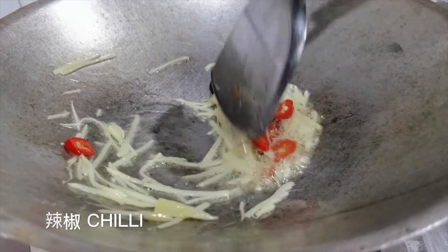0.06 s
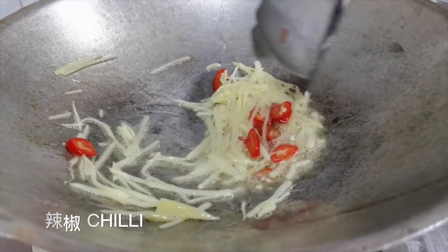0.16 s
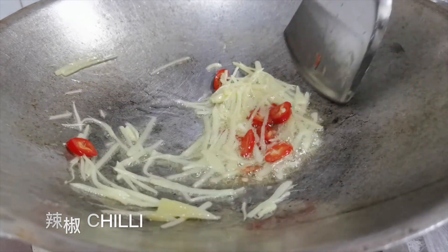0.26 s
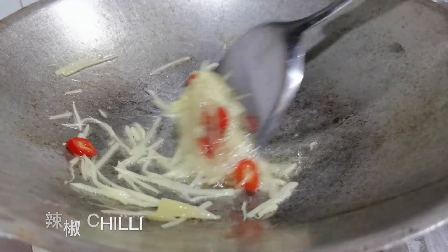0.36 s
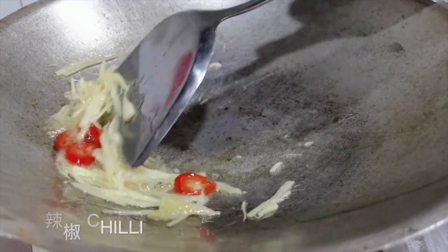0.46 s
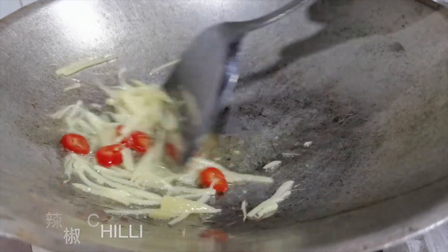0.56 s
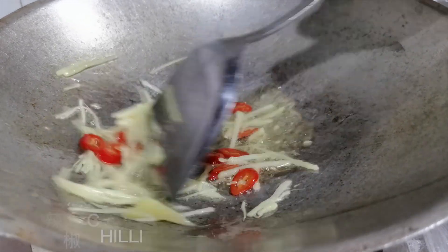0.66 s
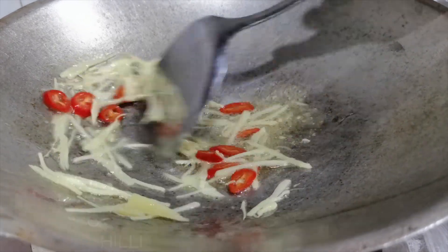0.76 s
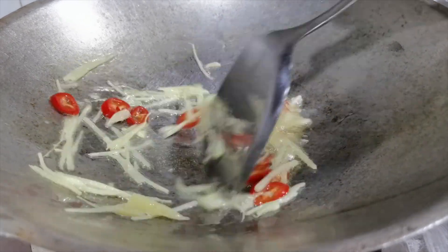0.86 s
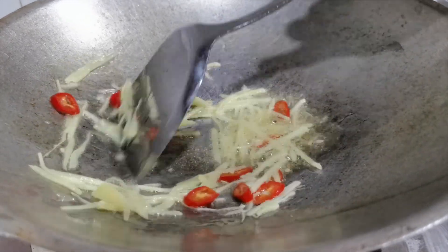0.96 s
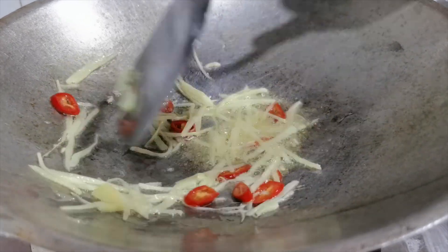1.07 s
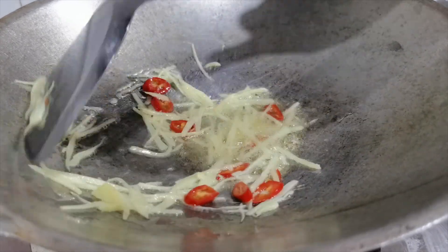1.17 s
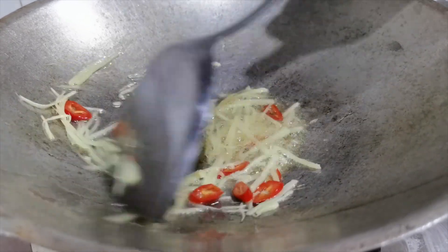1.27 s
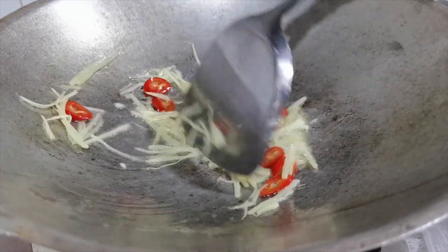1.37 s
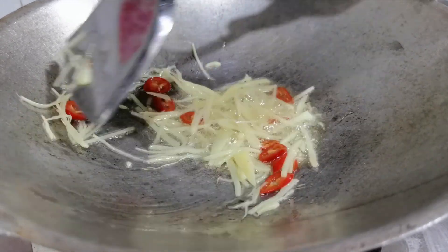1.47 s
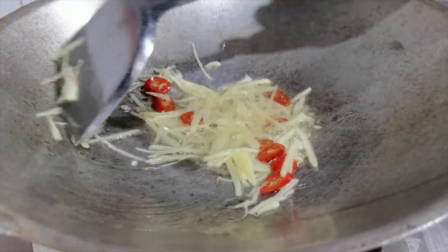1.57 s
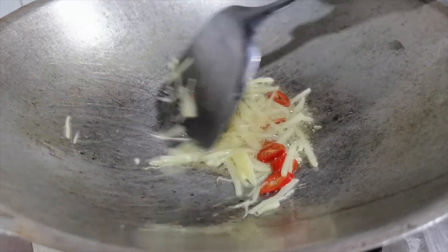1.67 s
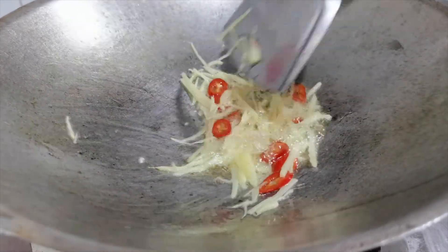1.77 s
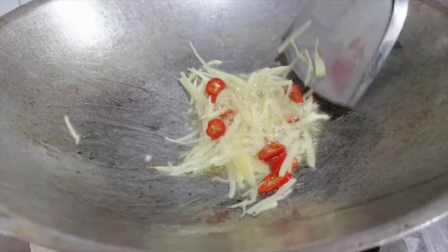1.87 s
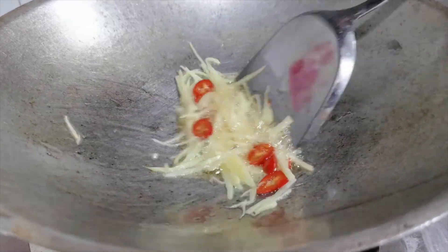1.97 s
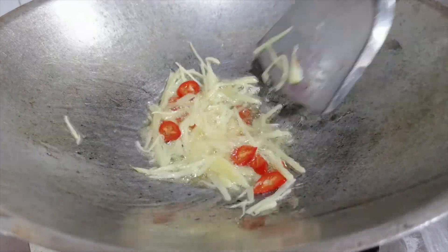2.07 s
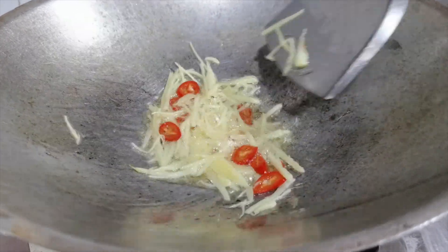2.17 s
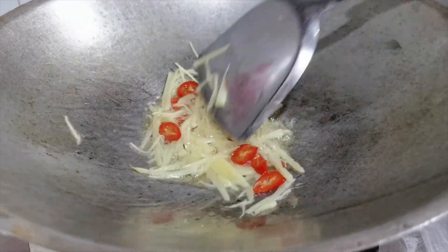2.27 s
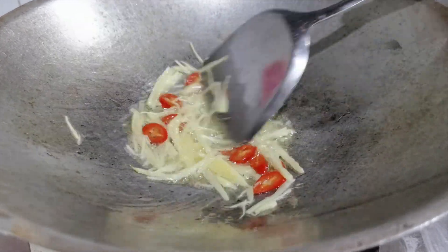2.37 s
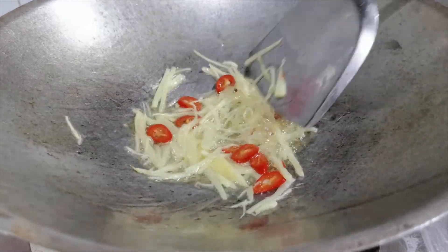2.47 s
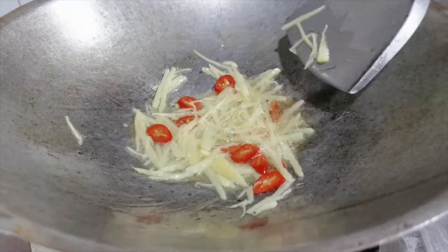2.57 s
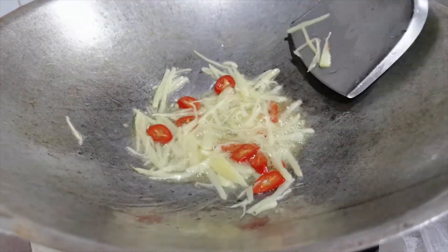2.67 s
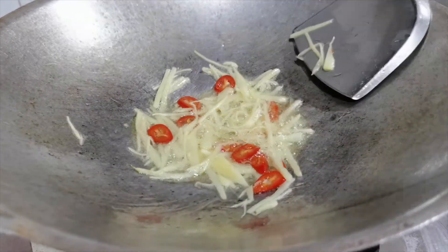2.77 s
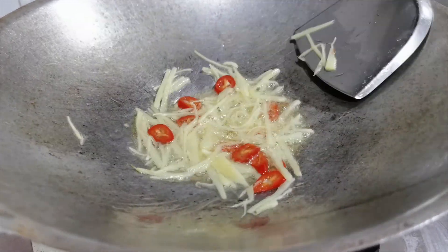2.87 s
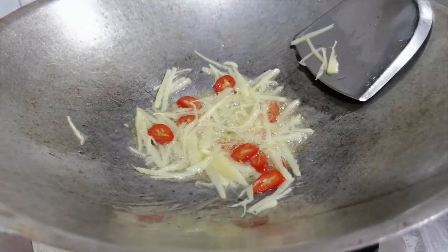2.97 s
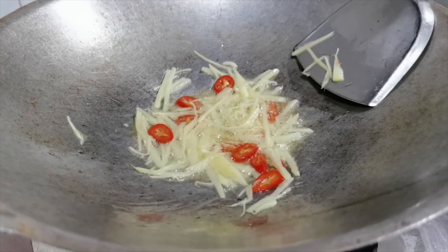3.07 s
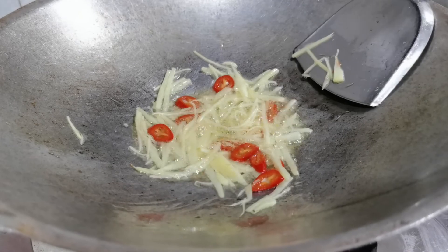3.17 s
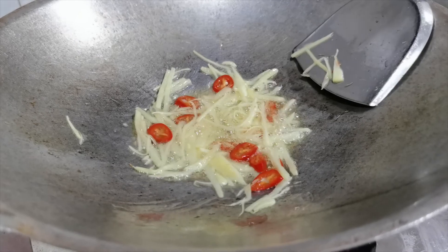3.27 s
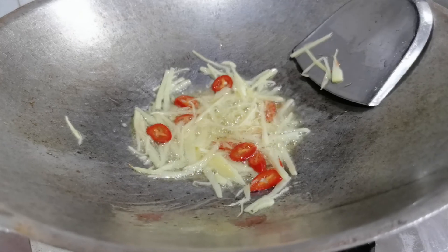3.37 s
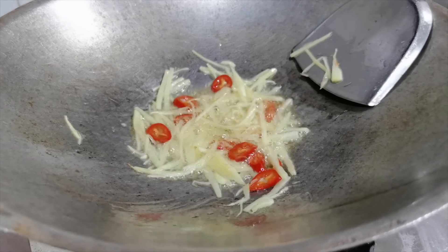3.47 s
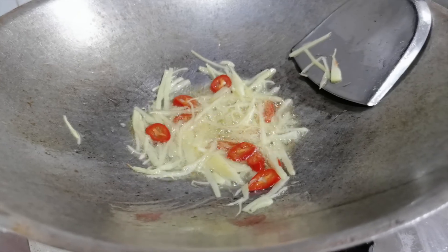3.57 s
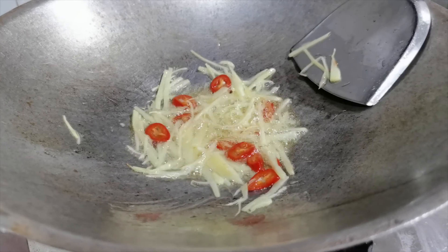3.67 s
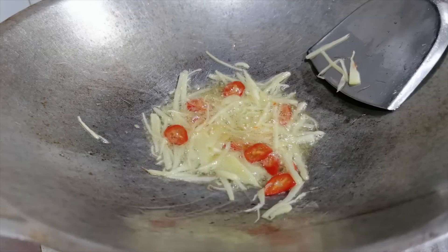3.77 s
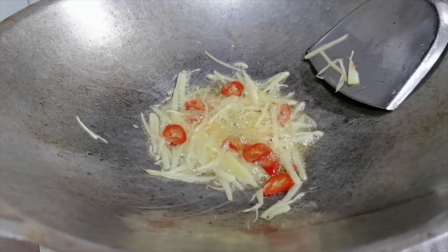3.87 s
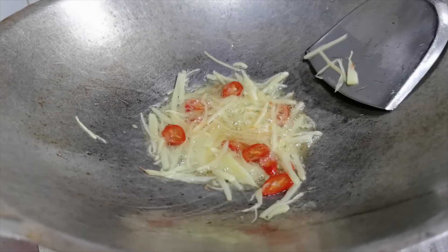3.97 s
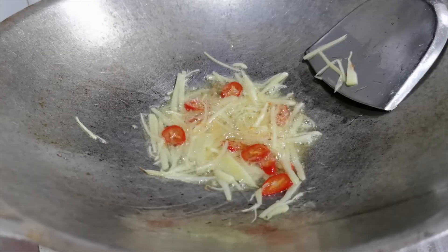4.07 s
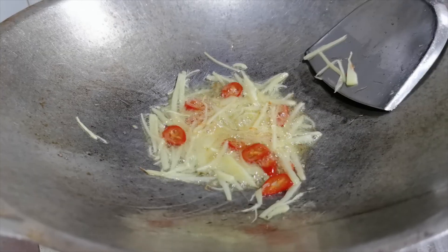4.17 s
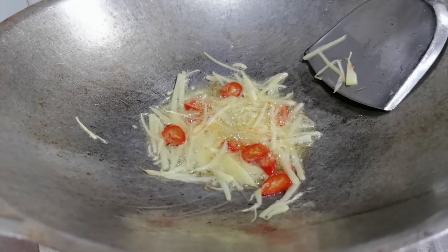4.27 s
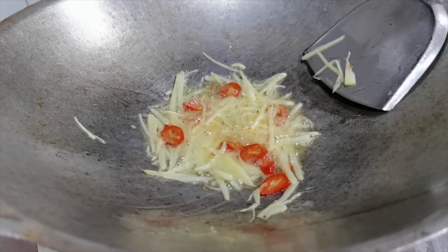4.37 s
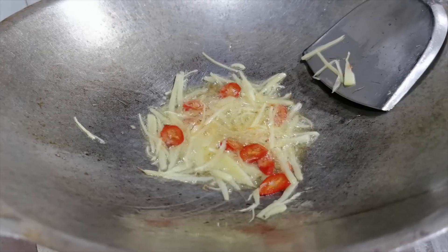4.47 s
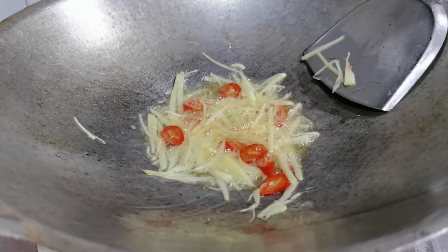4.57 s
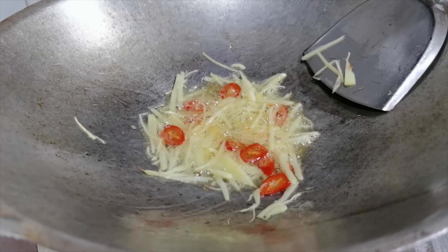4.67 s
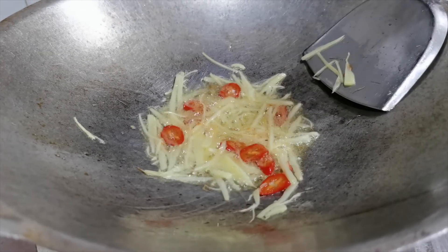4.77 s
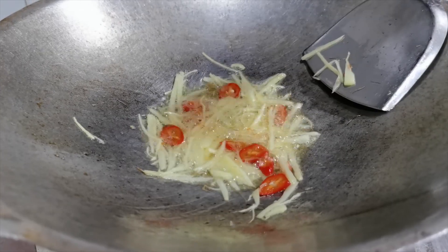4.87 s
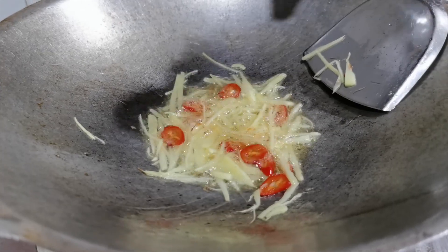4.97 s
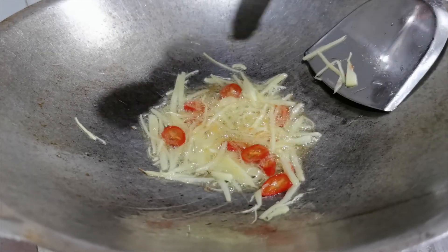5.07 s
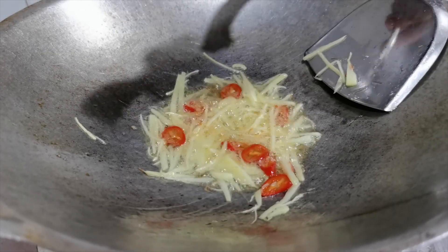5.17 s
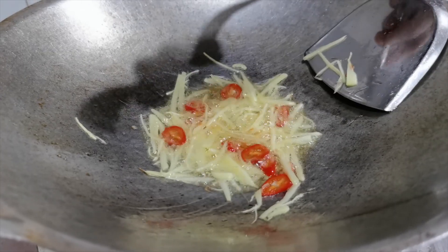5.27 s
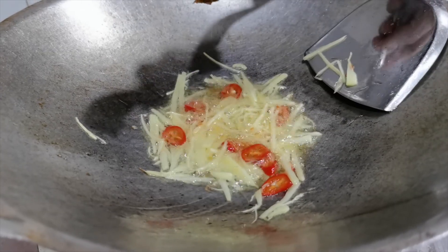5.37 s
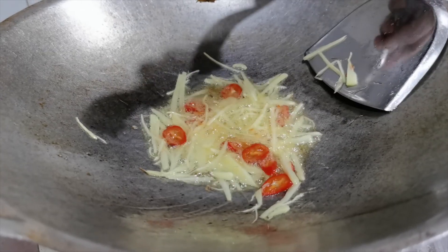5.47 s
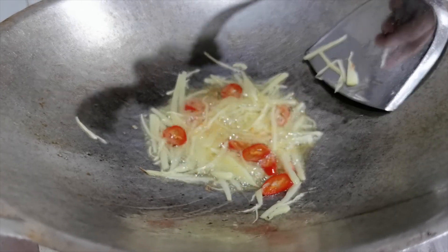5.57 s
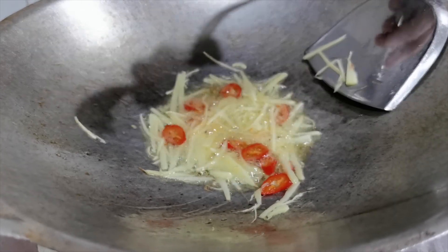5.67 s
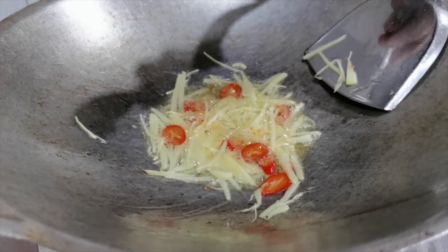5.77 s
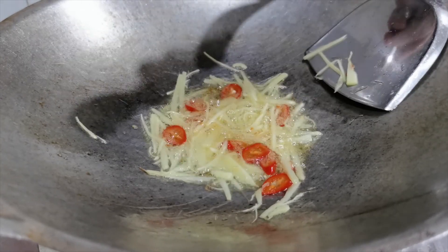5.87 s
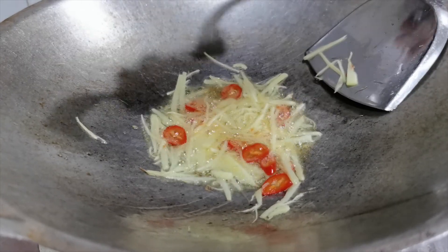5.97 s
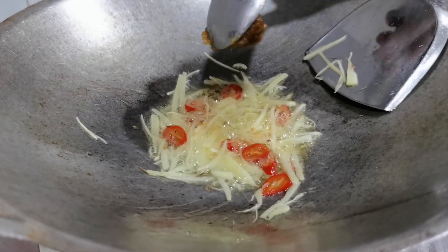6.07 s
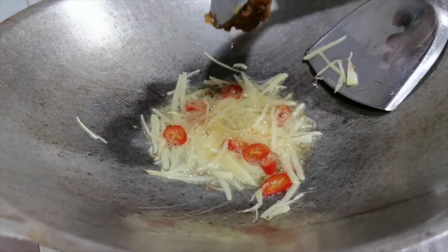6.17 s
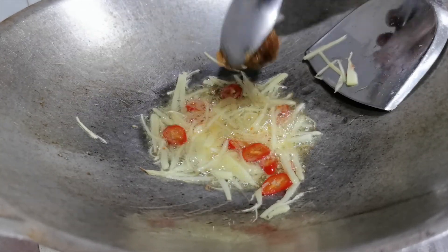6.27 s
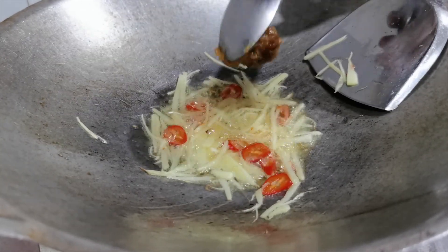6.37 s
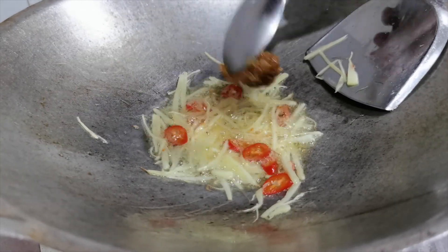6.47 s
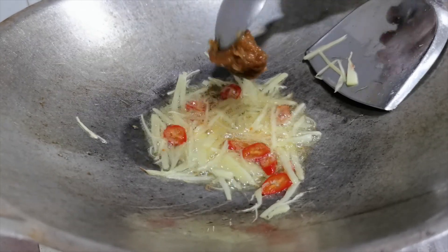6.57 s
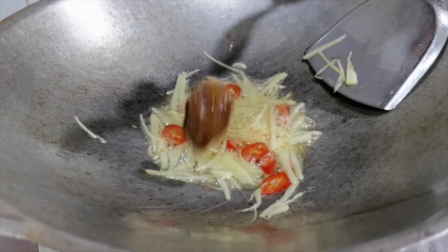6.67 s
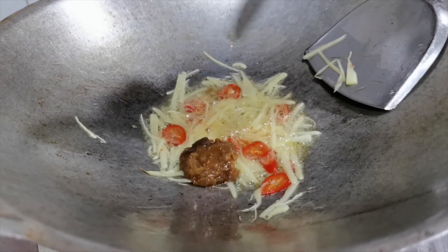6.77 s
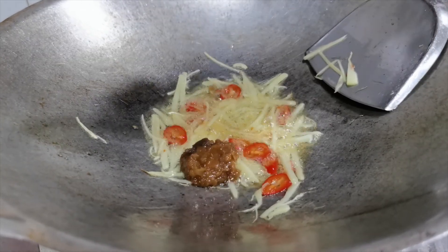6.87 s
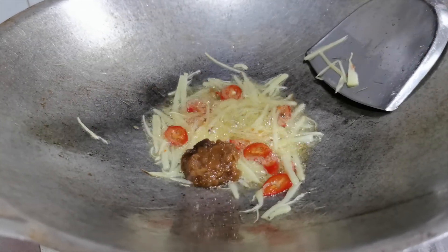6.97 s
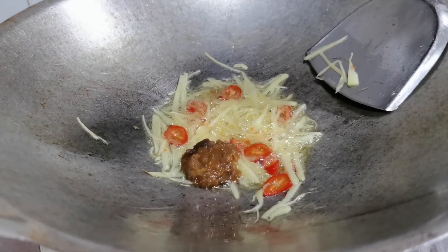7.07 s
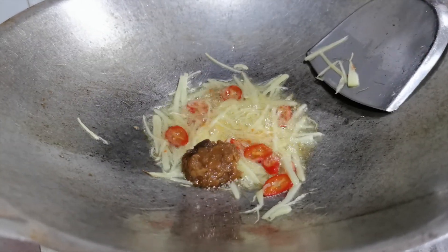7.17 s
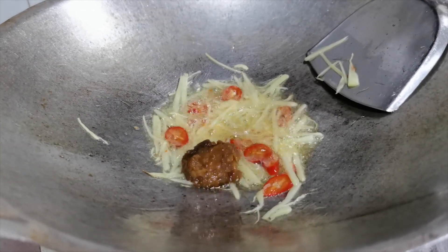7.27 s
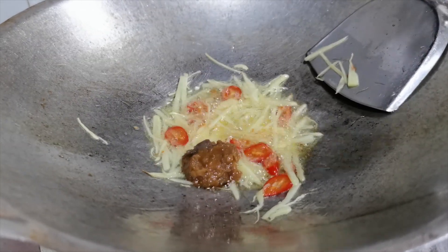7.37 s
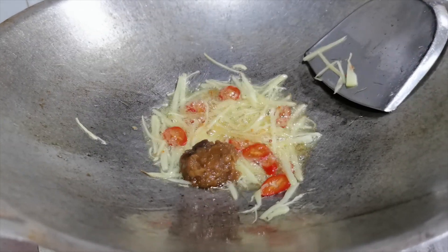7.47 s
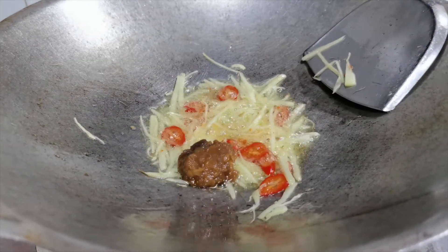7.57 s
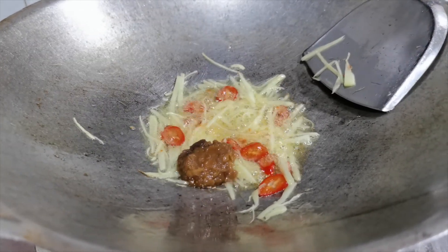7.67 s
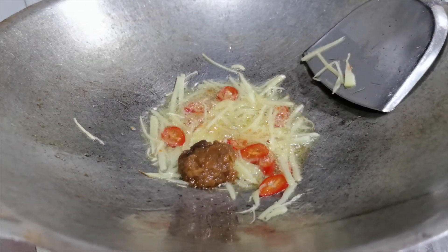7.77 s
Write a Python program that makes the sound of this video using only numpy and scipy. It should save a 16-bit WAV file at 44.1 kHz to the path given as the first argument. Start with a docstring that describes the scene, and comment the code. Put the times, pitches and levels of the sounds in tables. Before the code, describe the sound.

Vegetables sizzle in hot oil in a steel wok, heard up close in a small kitchen. A metal spatula strikes and scrapes the pan several times, leaving it ringing, then is set down with a clink and a brief chatter. The frying carries on with sharp little spits. Near the end, wet paste lands in the oil with a sudden loud hiss that eases off. A gas flame and fan hum faintly underneath.

```python
"""Stir-frying in a wok

Ginger and chilli sizzle in a steel wok over a gas flame, under a small kitchen's extractor fan.
Water bursts in the hot oil as fizz and single spits; late on, a spoonful of wet paste flares up.
A steel spatula strikes and scrapes the wok, rings as it lifts off, and is laid against the side."""
import sys
import numpy as np
from scipy import signal
from scipy.fft import rfft, irfft, next_fast_len
from scipy.io import wavfile

SR = 44100
rng = np.random.default_rng(int(sys.argv[2]) if len(sys.argv) > 2 else 0)


def waveform_to_disk(signal):
    """Save audio, clipped to [-1, 1], as 16-bit WAV at the path in sys.argv[1]."""
    frames = np.transpose(np.atleast_2d(signal))
    scaled = np.clip(frames, -1, 1) * 32767
    samples = np.round(scaled).astype(np.int16)
    wavfile.write(sys.argv[1], SR, samples)


N = 345303
T = np.arange(N) / SR
FFT_SIZE = next_fast_len(N + SR)
HZ = np.maximum(np.arange(FFT_SIZE // 2 + 1) * SR / FFT_SIZE, 1)

# A soft mid-range rush comes up. Each row: time in seconds, level in dB.
RUSH_LEVELS = [(0, -56), (3.7, -46), (3.95, -46), (7.83, -40.5)]
# The hum of the fan's motor. Each row: pitch in Hz, relative level in dB.
MOTOR_TONES = [(118.4, -50.5), (296.1, -60.5), (382.2, -62.5)]
# Swells in the flame's sound. Each row: middle in seconds, half-length in seconds, level in dB.
FLAME_PUFFS = [(1.35, 0.21, -56), (2.51, 0.039, -43), (4.0, 0.74, -57), (6.06, 0.21, -52)]
HOLLOW_SWELLS = [(3.35, 0.44, -44.5)]  # the roar turns hollow for a moment
LOW_BOOM_SWELLS = [(4.0, 0.7, -60), (6.5, 0.76, -51)]
# How hard the vegetables fry. Each row: time in seconds, relative level in dB.
FRYING_LEVELS = [(0.0, -39), (1.93, -41.5), (2.94, -40.5), (3.46, -43), (4.5, -39.5), (5.98, -42),
                 (6.65, -42)]
# The biggest water drops spit. Each row: time in seconds, relative level in dB, pitch in Hz.
BIG_DROPS = [(0.0697, -24.5, 10400), (0.4454, -18.5, 9180), (0.4868, -23.5, 9870), (1.052, -25, 7800),
             (2.5411, -26.5, 5700), (2.6344, -23, 11800), (3.091, -19, 6700), (3.2276, -22.5, 5620),
             (3.6726, -16, 12700), (4.6932, -18.5, 10200), (4.927, -22.5, 5950), (5.3268, -11.5, 6820),
             (5.5376, -15, 5170), (5.8912, -18, 7900), (5.9708, -20, 8000), (7.337, -16, 9800)]

# The spatula hits the wok; a loosely held blade clinks most. Each row: time in seconds, relative
# thud and clash levels in dB, clink compared with clash in dB, left minus right in dB,
# wait until the bounce in seconds, bounce compared with the hit in dB.
SPATULA_HITS = [(0.238, -38.5, -16.5, -1, 1, .013, 1.5), (0.739, -26, -29.5, -8, 1, 0.018, -18),
                (1.205, -18, -20, -6, -1, .007, -13), (1.534, -21.5, -20.5, -7, 1, .01, -15),
                (1.917, -35, -16, -7, 1.5, 0.039, -10), (2.703, -36, -15.5, 2, -1.5, 0.021, -2.5)]
# The blade is pushed along the steel. Each row: start and length in seconds, then the starting
# levels of groan, squeal and rasp in dB.
SCRAPE_STROKES = [(0.288, 0.083, -34, -42, -22.5), (0.527, 0.036, -42.5, -68, -41),
                  (0.756, 0.12, -37.5, -38.5, -28), (1.541, 0.064, -29, -33, -50),
                  (1.582, 0.085, -38.5, -27.5, -24.5), (1.933, 0.07, -34.5, -60, -28.5),
                  (2.301, 0.11, -44.5, -61, -34), (2.72, 0.048, -40, -44, -35)]
# The sliding edge catches. Each row: time in seconds, relative chatter and clash levels in dB.
EDGE_CATCHES = [(2.703, -25, -35), (2.769, -32, -29), (2.807, -29, -34), (2.875, -40, -34),
                (2.967, -34.5, -37), (3.02, -33.5, -32.5), (3.044, -38, -45), (3.163, -32, -39)]
# The steel is left to ring. Each row: start in seconds, relative level in dB, place struck
# (0 far wall, 1 near floor, 2 left side), build-up time in seconds.
RING_EVENTS = [(.241, -23.5, 0, 0.11), (1.207, -23.5, 1, 0.0044), (1.536, -21.5, 2, 0.02)]
# The tones of the freely ringing spatula and wok. Each row: pitch in Hz, seconds to fade by 60 dB,
# then relative levels in dB when struck at the far wall, the near floor and the left side.
STEEL_TONES = [(948, 1.85, -25.5, -8, -35), (1300, 0.93, -10.5, -1, -8.5), (1441, 2, -19, -14, -10),
               (1566, 0.56, 2.5, 2, 2), (1797, 1.01, -13, -4, -20), (1930, 1.9, -43, -15.5, -24),
               (2205, 0.86, -18, -9, -16), (2444, 1.4, -46, -13, -17), (2764, 0.97, -25, -11, -18),
               (2932, 0.77, -5.5, -6, -24), (3300, 0.66, -1, -5.5, -13), (3450, 1.4, -18, -17, -16),
               (3720, 0.74, -2.5, -11.5, -2.5), (4334, 0.78, -20, -14, -34)]

# Modes are the pitches that steel likes to shake at; pressing on it makes them broad and short.
# Each row: pitch in Hz, width in Hz, relative level in dB.
CLANG_MODES = [(616, 54, -5), (752, 53, -4), (1042, 47, 0), (1194, 52, -1), (3280, 39, -11), (4000, 45, -5),
               (5000, 55, -16), (5750, 120, -1)]  # the pressed wok
CLINK_MODES = [(440, 91, -1.5), (1548, 174, -3), (2853, 110, -2.5), (4800, 114, 8), (5400, 180, -6),
               (6100, 140, 3), (6600, 300, -11), (10270, 470, -2), (12200, 280, -3)]  # the blade pressing on it
GROAN_MODES = [(369, 59, -5), (476, 27, 3), (570, 40, 1.5), (702, 63, -3), (1040, 1000, -12.5),
               (1710, 300, -11), (2920, 470, -54)]
SQUEAL_MODES = [(1115, 180, 5.5), (1220, 110, 10.5), (1580, 110, 0), (1790, 110, -8)]
CHATTER_MODES = [(497, 190, -8), (860, 240, -12), (1120, 280, -9), (1376, 97, 2), (1570, 125, -0.5),
                 (2000, 350, -14), (2320, 240, -8), (2550, 140, -5.5), (2940, 140, -11), (3770, 730, -11.5),
                 (4690, 110, -3.5), (5800, 1500, -7.5)]

# The tone colour of each noise, from bass to treble. Each row: frequency in Hz, relative level in dB.
RUSH_COLOUR = [(150, -7), (400, -6.5), (750, -9), (1000, -4), (2000, -11.5), (5000, -8)]
FLAME_COLOUR = [(20, -28), (35, -13), (95, -15), (120, 3.5), (150, -1), (200, -4), (260, -9), (310, -19),
                (420, -16), (520, -23.5), (800, -32.5), (2000, -41)]
FIZZ_COLOUR = [(500, -24.5), (1000, -12), (2000, -9.5), (2600, -10.5), (3200, 1.5), (4300, -4), (5400, 0.5),
               (6800, -2.5), (8500, -2.5), (10400, 0.5), (12000, -4.5), (13500, -6), (16000, -1.5)]
PASTE_COLOUR = [(600, -27), (1200, -23), (2000, -8.5), (2700, -7), (3600, 2.5), (4350, -12), (5000, 1.5),
                (5700, 4), (6200, 3), (8200, -3), (10300, 1), (12000, -5.5), (14000, -8), (16000, -1)]
SPIT_COLOUR = [(1500, -23), (4000, -5), (16000, 2.5)]
RASP_COLOUR = [(1500, -15.5), (3400, -8.5), (4300, -8), (5400, 2.5), (7000, -2), (8600, -2.5), (10500, -2),
               (16000, -10.5)]
THUD_COLOUR = [(200, -39), (350, -1.5), (550, 7), (900, -0.5), (1200, 3), (1650, -1), (2200, -15.5),
               (3300, -13.5), (4500, -18)]
CLASH_COLOUR = [(1000, -36), (1550, -8), (2050, -11), (2850, -7.5), (4300, -12), (4820, -3), (5400, 0),
                (6800, 0.5), (8600, -7.5), (10200, 0.5), (11500, -3), (12100, -14), (12900, -4),
                (16000, -8.5)]

# How the two microphone openings differ. Each row: frequency in Hz, left minus right in dB.
MIC_BALANCE = [(60, 1.2), (200, 3.5), (700, 0.5), (1300, 1), (2400, 2.5), (3700, -3.5), (5500, 1.5),
               (7000, -4), (8300, 4.5), (9800, -0.5), (11000, 9.5), (12300, -15), (14000, -0.5),
               (16000, -2)]


def gain(db):
    """Turn decibels into a number to multiply by."""
    return 10 ** (np.asarray(db) / 20)


def unit(x):
    """Scale x to an average power of 1."""
    return x / np.sqrt(np.mean(abs(x) ** 2))


def pan(left_minus_right_db):
    """Gains for the left and right channels."""
    return gain(np.array([[1], [-1]]) * left_minus_right_db / 2)


def add(out, start_s, x):
    """Mix x into out at the given time."""
    i = int(start_s * SR)
    out[:, i:i + x.shape[1]] += x[:, :N - i]


def curve(rows):
    """Join (time, value) rows with straight lines."""
    return np.interp(T, *np.transpose(rows))


def swells(rows):
    """A gain that rises and falls smoothly once for each row."""
    return sum(gain(db) * np.exp(-((T - middle_s) / half_s) ** 2) for middle_s, half_s, db in rows)


def wander(turns_per_s):
    """A random drift around zero, usually by about 1."""
    points = rng.standard_normal(1024)
    return 1.6 * np.interp(T * turns_per_s, np.arange(len(points)), points)


def causal(gains):
    """Build a filter with these gains that rings only after it is struck, never before."""
    cepstrum = irfft(np.log(gains + 1e-4), FFT_SIZE)
    cepstrum[1:FFT_SIZE // 2] *= 2
    cepstrum[FFT_SIZE // 2 + 1:] = 0
    return np.exp(rfft(cepstrum))


def colour(rows):
    """A filter that follows a tone colour table."""
    hz, db = np.transpose(rows)
    return causal(gain(np.interp(np.log(HZ), np.log(hz), db)))


def resonances(modes):
    """A filter with one steep peak for each mode."""
    peaks = (gain(db) / (1 + ((HZ - hz * hz / HZ) / width) ** 2) for hz, width, db in modes)
    return causal(np.sqrt(sum(peak ** 2 for peak in peaks)))


def through(x, response):
    """Pass x through a filter, scaled so that white noise keeps its level."""
    return irfft(rfft(x, FFT_SIZE) * unit(response), FFT_SIZE)[..., :N]


def burst(fade_s):
    """Crowded echoes: stereo noise that dies away by 60 dB in fade_s."""
    t = T[:SR // 2]
    return rng.standard_normal((2, len(t))) * np.exp(-np.log(1000) * t / fade_s)


def rattle(per_s, scatter_db, fade_s, force=1):
    """Random clicks of unequal size, each with its own tail of echoes off the bowl."""
    sizes = gain(scatter_db * np.minimum(rng.standard_normal(N), 2.6))
    clicks = unit((rng.random(N) < per_s / SR) * sizes) * force
    decay = np.exp(-2 * np.log(1000) / (fade_s * SR))
    power = signal.lfilter([1 - decay], [1, -decay], clicks ** 2 + 1e-18)
    return np.sqrt(power) * rng.standard_normal((2, N))


def push(start_s, length_s, rise_s=0.0018):
    """The pressure of one stroke: on quickly, off a little more slowly."""
    press = np.clip((T - start_s) / rise_s, 0, 1)
    release = np.clip((start_s + length_s - T) / (2 * rise_s) + .5, 0, 1)
    return press * release


def kitchen_echo(x, fade_s=.25):
    """The tiled walls send back a short echo, with left and right swapped."""
    tail = burst(fade_s)
    tail /= np.sqrt(np.sum(tail ** 2) / 2)
    return signal.fftconvolve(x[::-1], tail, axes=1)[:, :N]


def soft_rush():
    """A soft mid-range rush comes up in the background."""
    return through(rng.standard_normal((2, N)), colour(RUSH_COLOUR)) * gain(curve(RUSH_LEVELS))


def extractor_fan():
    """The motor hums with a slight waver."""
    hum = np.zeros(N)
    for hz, db in MOTOR_TONES:
        tone = unit(np.sin(2 * np.pi * hz * T + 0.15 * wander(2.7)))
        hum += tone * gain(db - 2.5 + 2 * wander(2.09))
    return hum


def gas_burner(roar_db=-44, boom_db=-62, boom_hz=65.5):
    """The flame roars, flutters and puffs, with a low boom swelling under it."""
    flutter = gain(1.55 * wander(7.7))
    roar = through(rng.standard_normal((2, N)), colour(FLAME_COLOUR))
    roar *= (gain(roar_db) + swells(FLAME_PUFFS)) * flutter
    hollow = through(rng.standard_normal(N), resonances([(146.5, 30, 0)])) * swells(HOLLOW_SWELLS)
    boom = unit(np.sin(2 * np.pi * boom_hz * T + .5 * wander(7.2)))
    boom *= (gain(boom_db) + swells(LOW_BOOM_SWELLS)) * gain(2 * wander(8))
    return roar + hollow + boom


def steam_bubbles(per_s_at_8khz, scatter_db):
    """Tiny bubbles burst, each size at its own pitch; small, high ones are the most common."""
    out = 0
    for hz in np.geomspace(3500, 14000, num=11):
        band = signal.butter(2, [hz * .91, hz * 1.09], "band", fs=SR, output="sos")
        pops = rattle(per_s_at_8khz * hz / 8000, scatter_db, fade_s=0.084)
        out = out + signal.sosfilt(band, pops) * (hz / 8000) ** .5
    return unit(out)


def oil_resonance():
    """A filter for the two high pitches at which the pool of frying oil resonates."""
    return 1 + resonances([(5644, 330, -1.5), (10550, 250, -12)])


def frying_vegetables():
    """Water bursts in the oil as a fine fizz with a coarser crackle on top."""
    fizz = rattle(per_s=6000, scatter_db=7.6, fade_s=0.013) * gain(1.3 * wander(18))
    crackle = steam_bubbles(130, scatter_db=6.5) * gain(wander(5) - 1.5)
    sizzle = (fizz + crackle) * gain(curve(FRYING_LEVELS) + 0.5)
    return through(sizzle, colour(FIZZ_COLOUR) * oil_resonance())


def wet_paste(start_s=6.697, rise_s=.028, boil_s=0.061):
    """Wet paste lands in the oil, hisses up quickly and calms as its water boils off."""
    age = np.maximum(T - start_s, 0)
    level_db = -25.5 - 7 * np.log10(1 + age / boil_s)
    strength = np.minimum(age / rise_s, 1) * gain(level_db + 0.58 * wander(25))
    hiss = rattle(per_s=8600, scatter_db=3, fade_s=0.038)
    crackle = gain(-4.5) * steam_bubbles(300, scatter_db=7.1)
    return through((hiss + crackle) * strength, colour(PASTE_COLOUR) * oil_resonance())


def spitting_drops(small_per_s=3.5, low_hz=6500, high_hz=12000):
    """Big drops and random small ones each burst with a crack that rattles about the bowl."""
    chances = rng.random((int(small_per_s * N / SR), 3))
    small_drops = [(when * T[-1], -29.5 + 5 * size, low_hz * (high_hz / low_hz) ** pitch)
                   for when, size, pitch in chances]
    out = np.zeros((2, N))
    for start_s, db, hz in list(BIG_DROPS) + small_drops:
        band = signal.butter(1, [hz * .88, hz * 1.11], "band", fs=SR, output="sos")
        crack = signal.sosfilt(band, burst(.022) + gain(-14) * burst(.11))
        crack /= np.sqrt(np.mean(crack[:, :SR // 250] ** 2))  # the first 4 ms set the level
        level_db = db - 5 - np.log2(hz / 8000)  # higher-pitched cracks are played a little quieter
        add(out, start_s + .0008, crack * gain(level_db))
    return through(out, colour(SPIT_COLOUR)) * pan(2.1)


def spatula_settling(start_s=2.703, length_s=.53, catch_decay_s=0.02):
    """The spatula chatters as it slides to rest, louder each time its edge catches."""
    age = np.clip(T - start_s, 0, length_s)
    slide = gain(-45 + age) * push(start_s, length_s)  # nearly even: up 1 dB a second
    catches = sum(gain(db) * (T > catch_s) * np.exp(-abs(T - catch_s) / catch_decay_s)
                  for catch_s, db, _ in EDGE_CATCHES)
    chatter = rattle(per_s=900, scatter_db=1.8, fade_s=0.037, force=slide + catches)
    return through(chatter, resonances(CHATTER_MODES))


def spatula_scrapes(ease_db_per_s=69):
    """The edge sticks and slips: the wok groans, the blade squeals and the rough steel rasps."""
    forces = np.zeros((3, N))
    for start_s, length_s, *levels_db in SCRAPE_STROKES:
        eased_db = ease_db_per_s * np.clip(T - start_s, 0, length_s)  # the hand eases off
        forces += gain(np.array(levels_db)[:, None] - eased_db) * push(start_s, length_s)
    groan = rattle(per_s=2000, scatter_db=1.8, fade_s=0.019, force=forces[0])
    squeal = rattle(per_s=1800, scatter_db=4, fade_s=0.0095, force=forces[1])
    rasp = rattle(per_s=1900, scatter_db=5.8, fade_s=0.067, force=forces[2])
    pitched = through(groan, resonances(GROAN_MODES)) + through(squeal, resonances(SQUEAL_MODES))
    return pitched * pan(2.2) + through(rasp, colour(RASP_COLOUR))


def spatula_hits():
    """At each contact the wok thuds and clangs, the steel clashes and the blade clinks."""
    contacts = []
    for start_s, thud_db, clash_db, clink_db, pan_db, wait_s, bounce_db in SPATULA_HITS:
        contacts.append((start_s, thud_db, clash_db, clink_db, pan_db))
        contacts.append((start_s + wait_s, thud_db + bounce_db, clash_db + bounce_db, clink_db, pan_db))
    # a catch of the sliding edge is a light tap with very little thud
    contacts += [(start_s, clash_db - 15, clash_db, -3, -2) for start_s, _, clash_db in EDGE_CATCHES]
    thud, clang, clash, clink = np.zeros((4, 2, N))
    for start_s, thud_db, clash_db, clink_db, pan_db in contacts:
        add(thud, start_s + .001, burst(0.078) * gain(thud_db + 4.5) * pan(1))
        add(clang, start_s, burst(0.66) * gain(thud_db - 13))
        add(clash, start_s + .001, burst(0.048) * gain(clash_db + 5.5) * pan(pan_db))
        add(clink, start_s + .0022, burst(0.097) * gain(clash_db + clink_db) * pan(pan_db))
    wok = through(thud, colour(THUD_COLOUR)) + through(clang, resonances(CLANG_MODES))
    return wok + through(clash, colour(CLASH_COLOUR)) + through(clink, resonances(CLINK_MODES))


def steel_ringing():
    """Tones build up as the blade drags, then ring on; the place struck sets their mix."""
    out, t = np.zeros((2, N)), T[:3 * SR]
    hz, fade_s, *place_db = np.transpose(STEEL_TONES)
    lag_s = np.array([0, .0001])[:, None, None]  # the right side hears it slightly later
    tones = np.sin(2 * np.pi * hz[:, None] * (t - lag_s)) * np.exp(-np.log(1000) * t / fade_s[:, None])
    # low tones spread to the left, high ones to the right
    tones *= pan(np.interp(hz, [1400, 2400], [4.4, -1.4]))[:, :, None]
    for start_s, db, place, build_s in RING_EVENTS:
        ring = gain(db + place_db[round(place)]) @ tones
        add(out, start_s, ring * np.minimum(t / build_s, 1) ** .5)
    return out


def scene():
    """Mix everything; the spatula's knocks and scrapes and the oil echo in the kitchen."""
    spatula = spatula_hits() + spatula_scrapes() + spatula_settling()
    oil = frying_vegetables() + wet_paste() + spitting_drops()
    echo = gain(-11) * kitchen_echo(spatula + oil)
    return gas_burner() + extractor_fan() + soft_rush() + echo + oil + spatula + steel_ringing()


def record(dry, shared_below_hz=600, top_hz=15800):
    """Two close microphone openings share the bass but colour the treble differently; the top is cut."""
    middle = rfft(dry[0] + dry[1], FFT_SIZE) / 2
    side = rfft(dry[0] - dry[1], FFT_SIZE) / 2
    side /= np.sqrt(1 + (shared_below_hz / HZ) ** 4)
    hz, db = np.transpose(MIC_BALANCE)
    balance = pan(np.interp(np.log(HZ), np.log(hz), db))
    stereo = irfft(np.array([middle + side, middle - side]) * balance, FFT_SIZE)[:, :N]
    top_cut = signal.ellip(10, .2, 70, top_hz, fs=SR, output="sos")
    return signal.sosfilt(top_cut, stereo)


dry = scene()
out = record(dry)
waveform_to_disk(out)
```